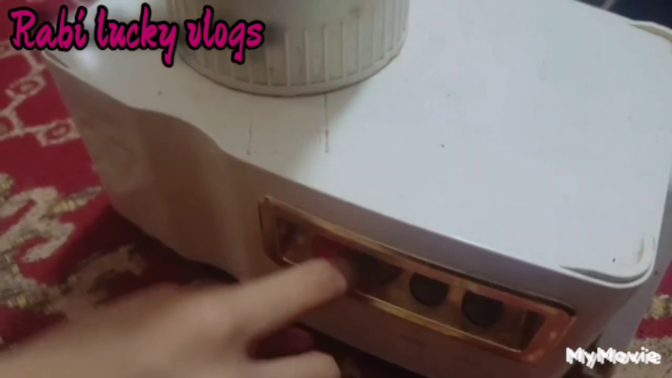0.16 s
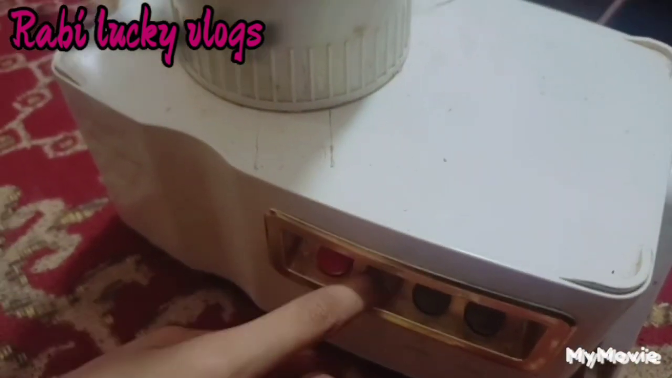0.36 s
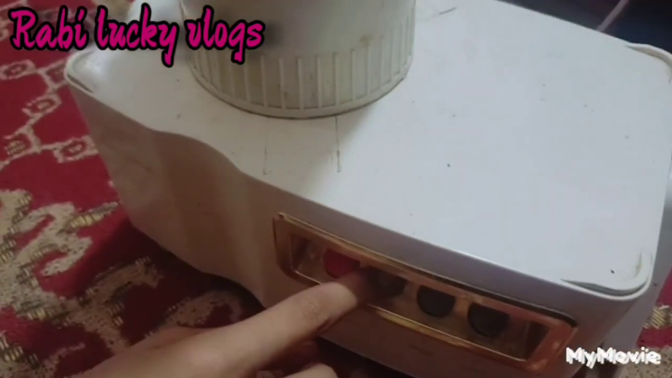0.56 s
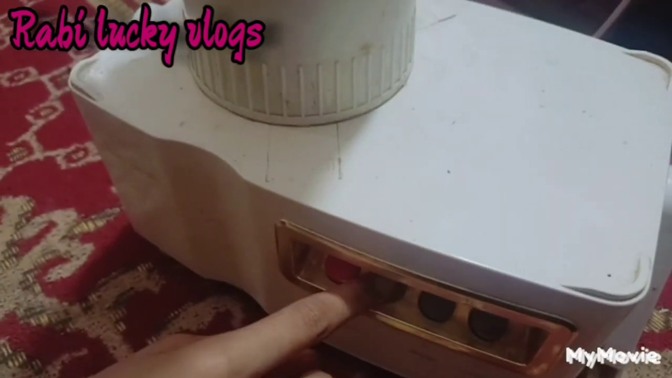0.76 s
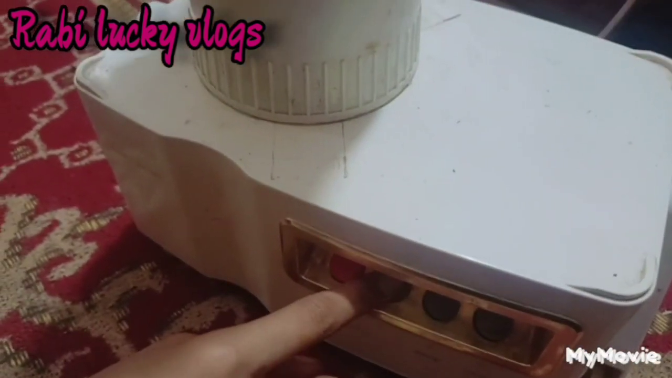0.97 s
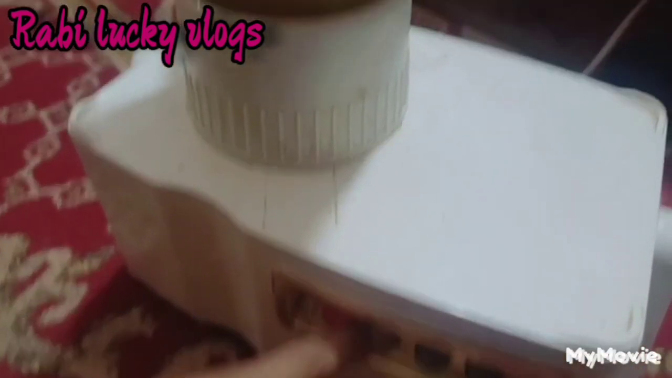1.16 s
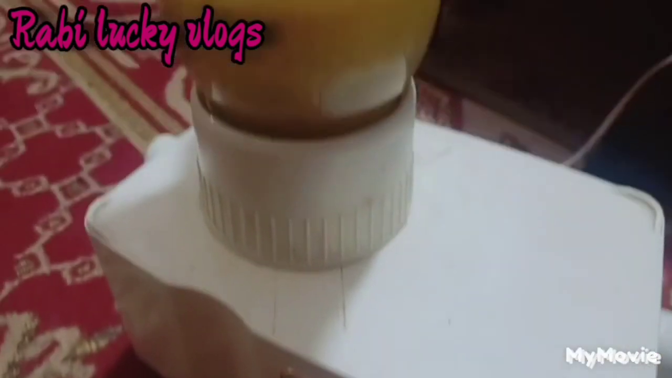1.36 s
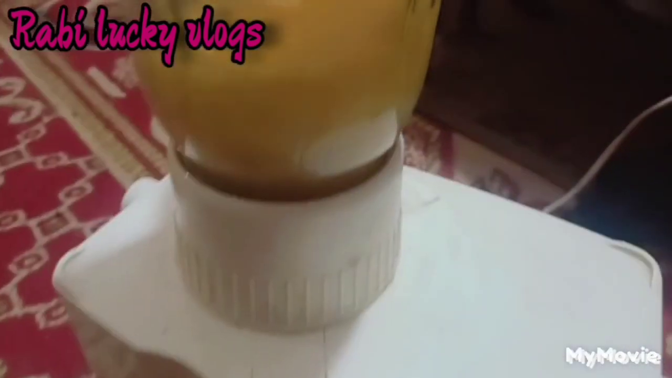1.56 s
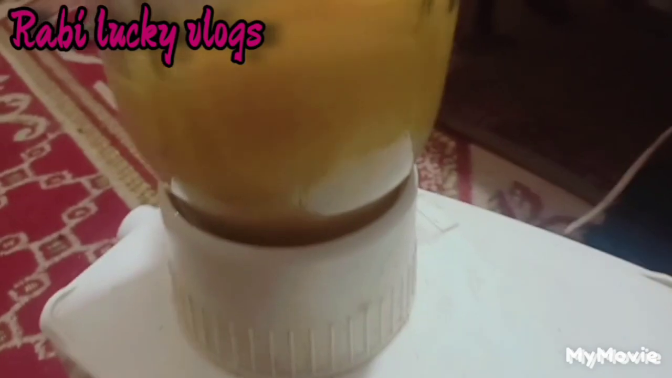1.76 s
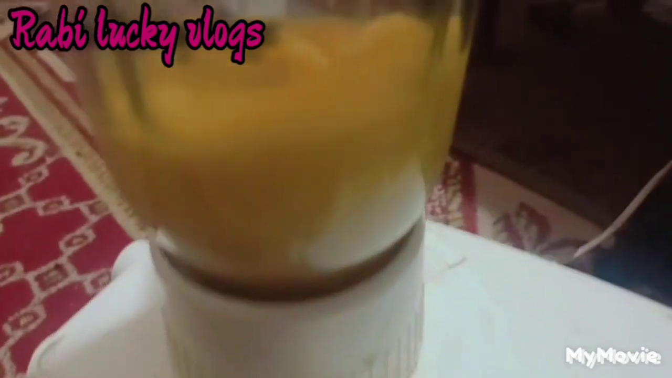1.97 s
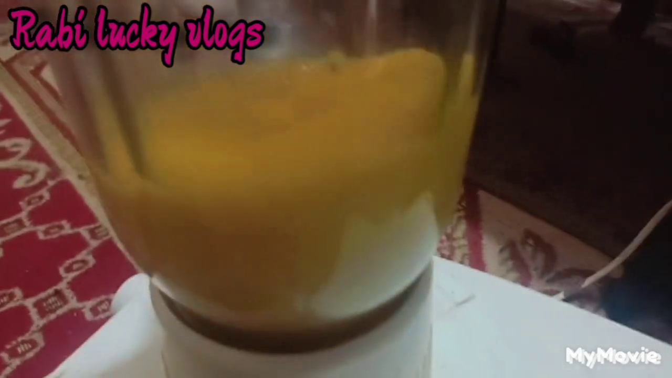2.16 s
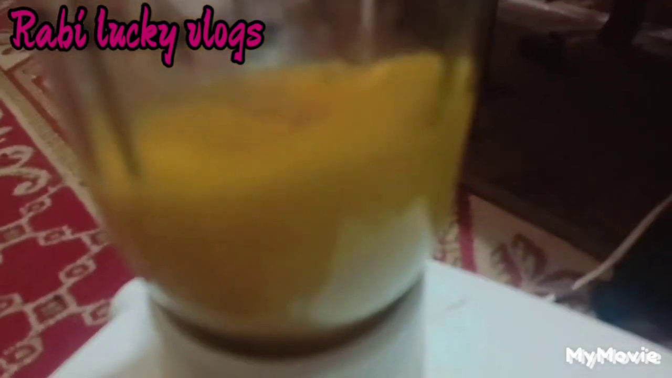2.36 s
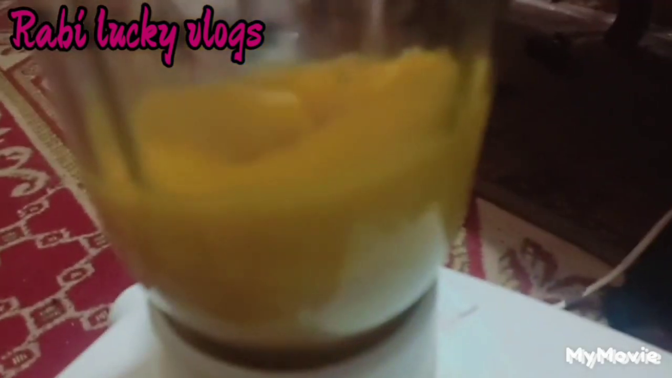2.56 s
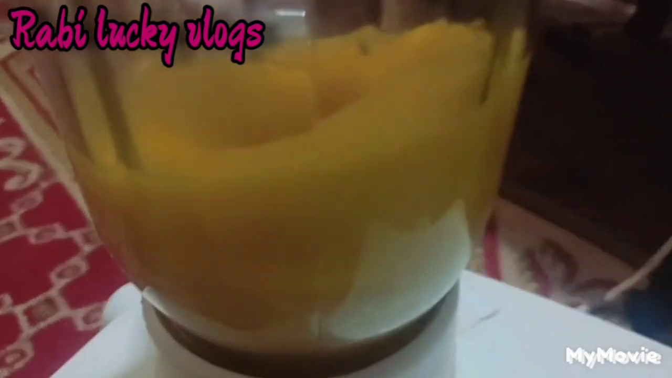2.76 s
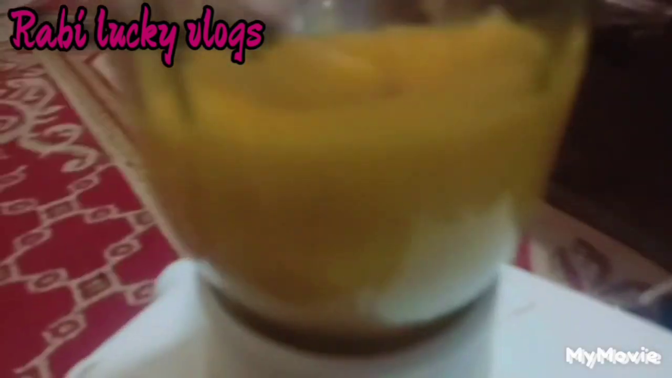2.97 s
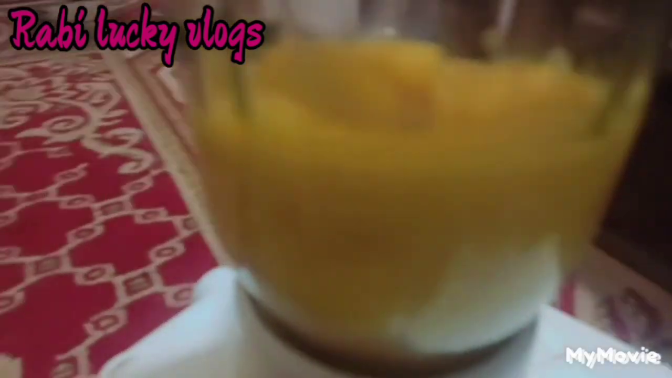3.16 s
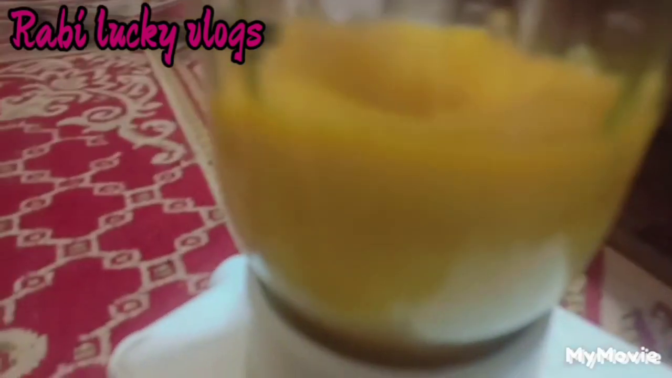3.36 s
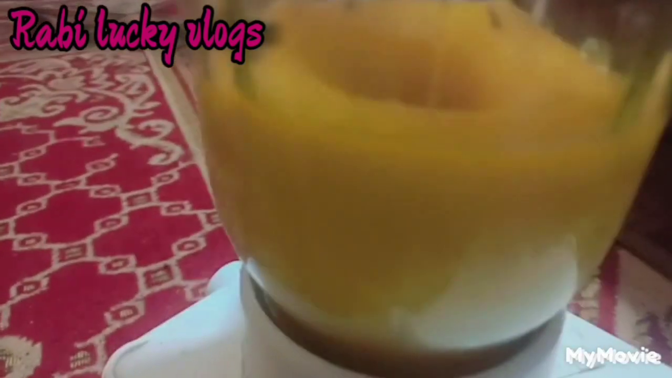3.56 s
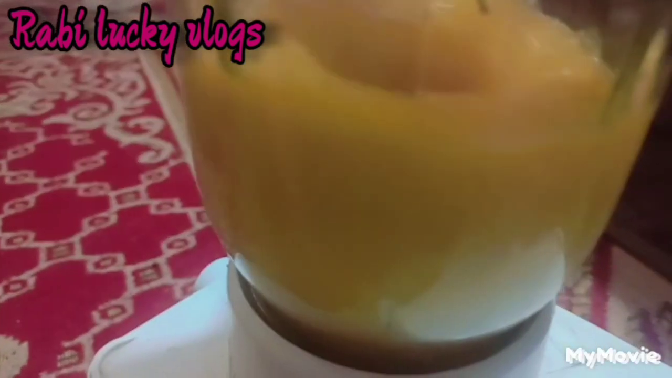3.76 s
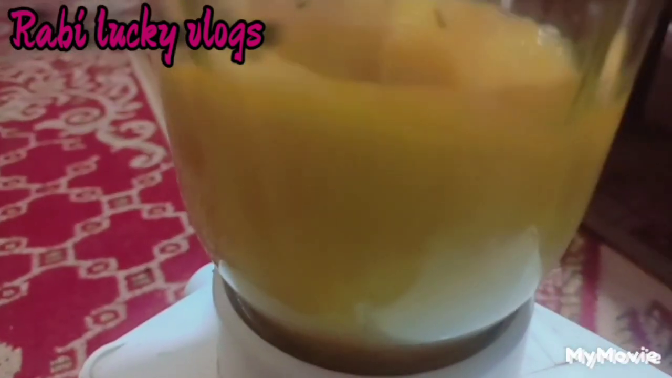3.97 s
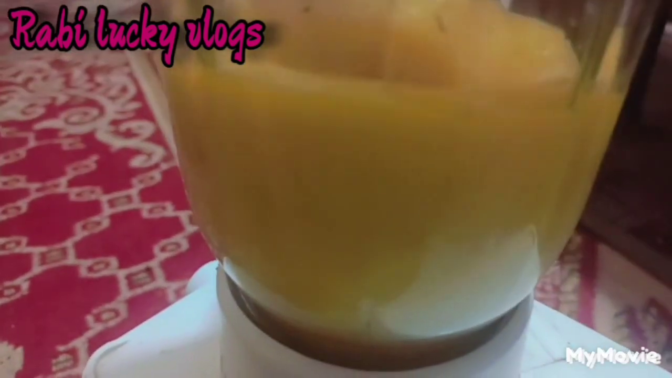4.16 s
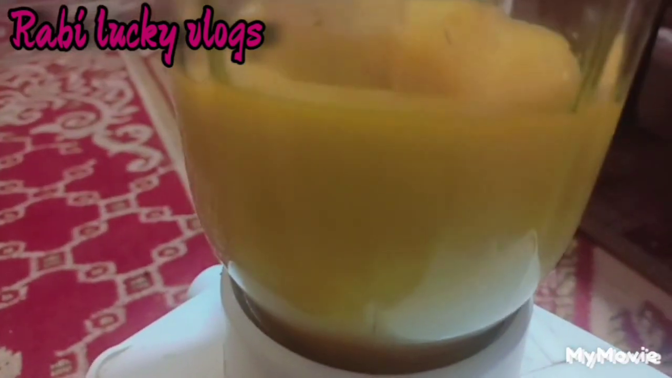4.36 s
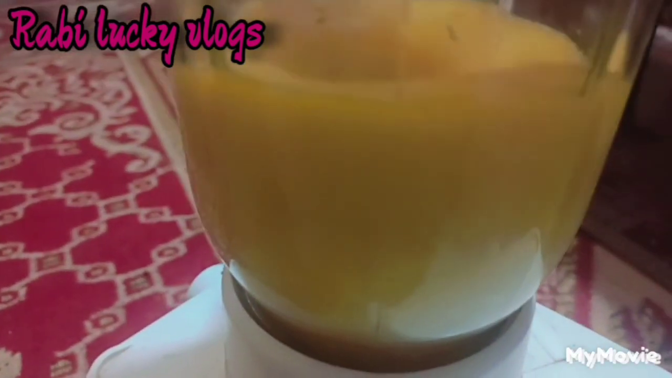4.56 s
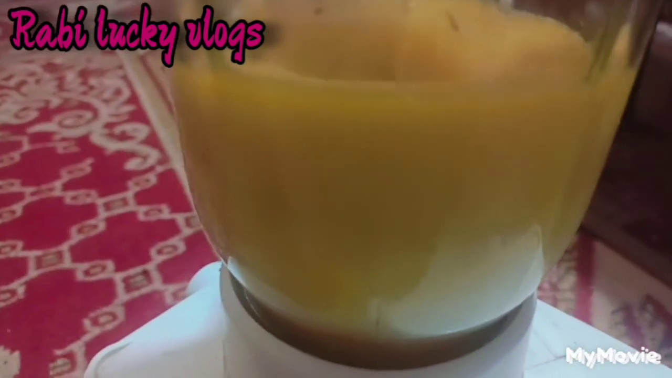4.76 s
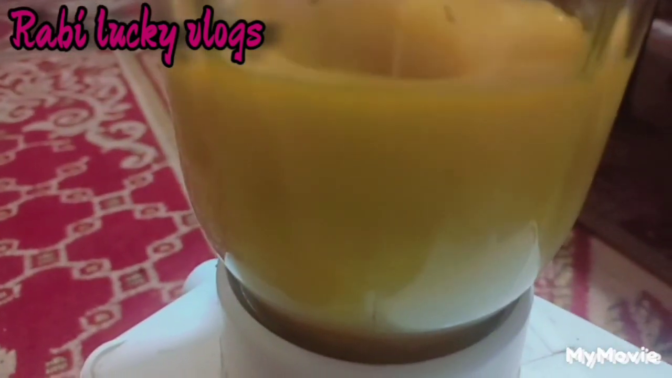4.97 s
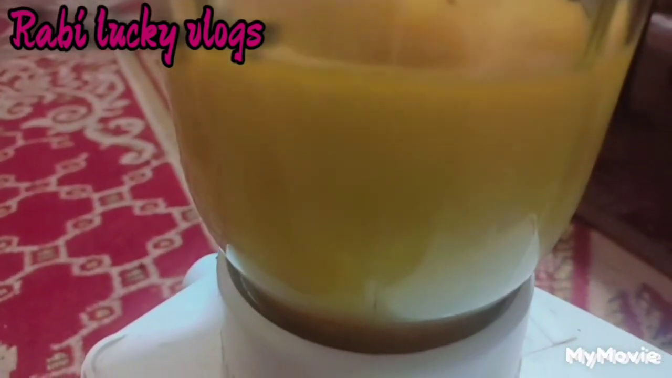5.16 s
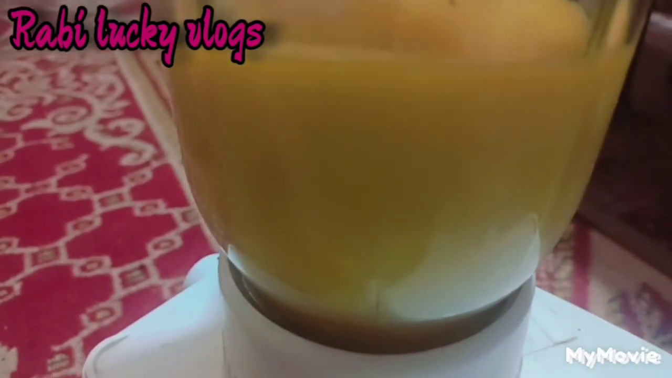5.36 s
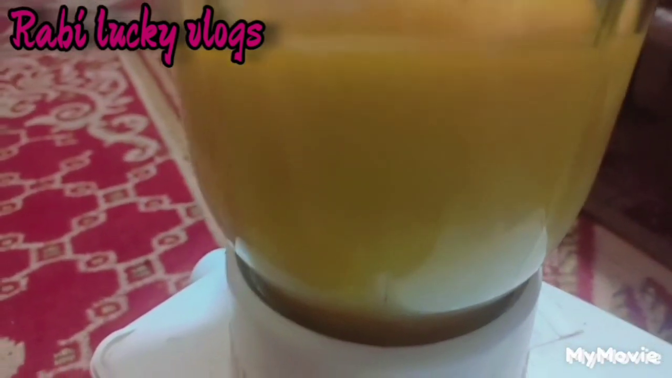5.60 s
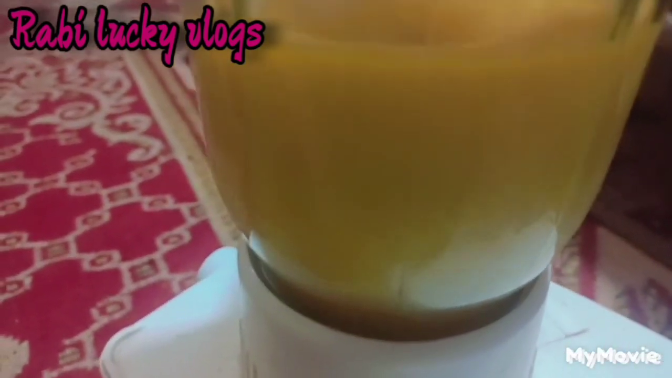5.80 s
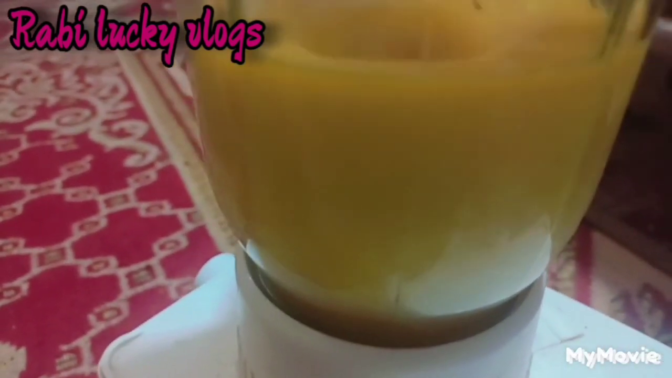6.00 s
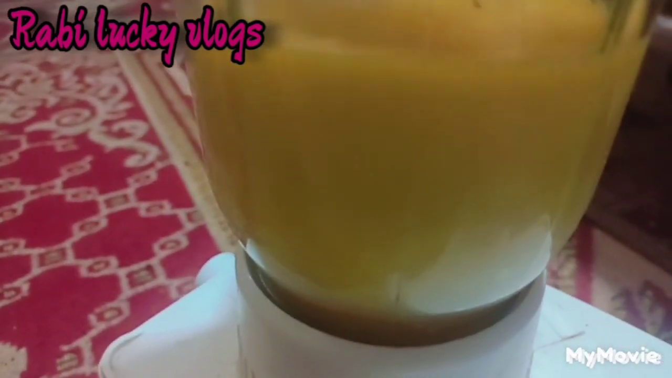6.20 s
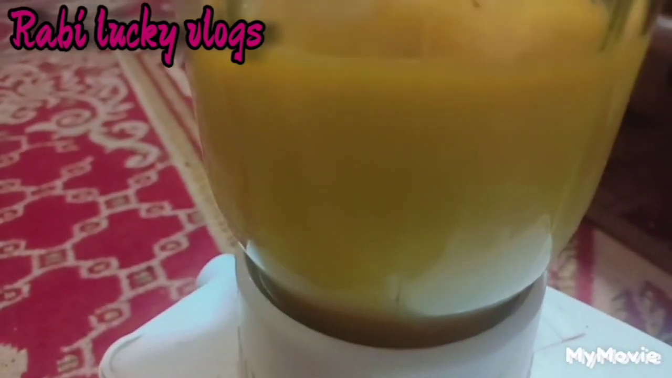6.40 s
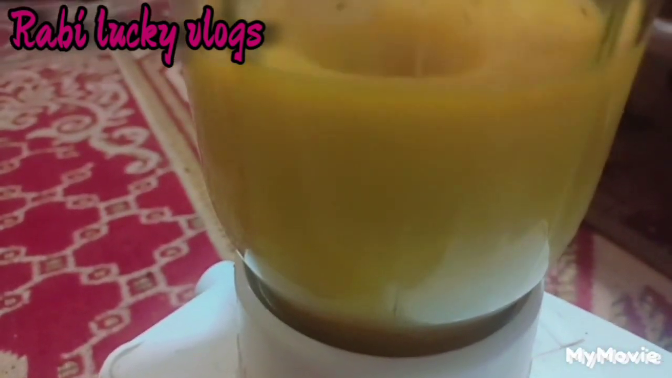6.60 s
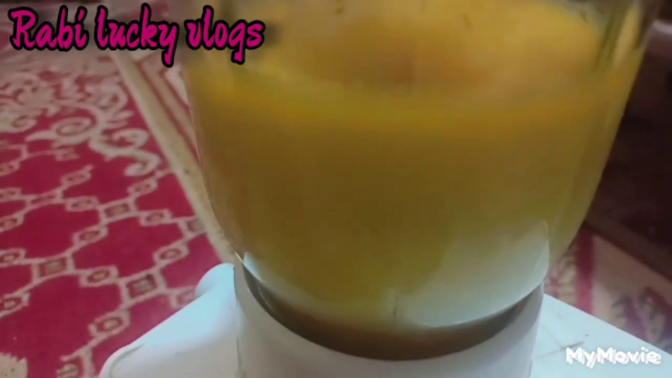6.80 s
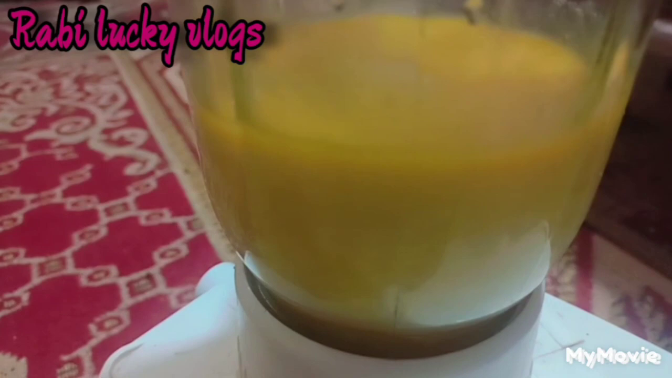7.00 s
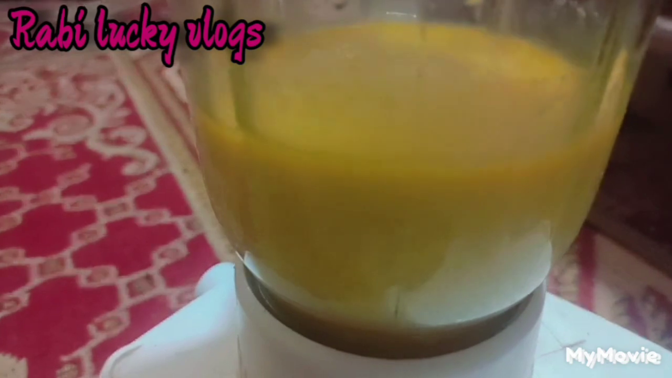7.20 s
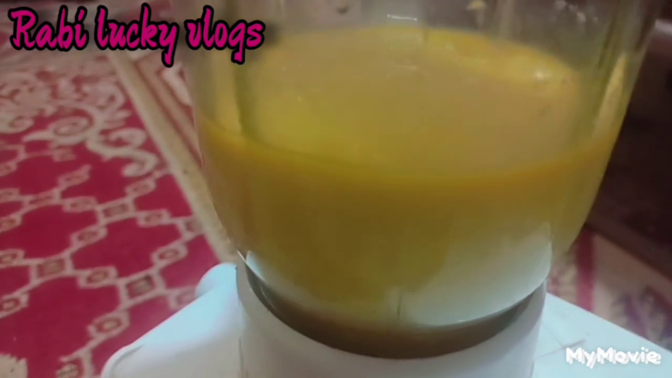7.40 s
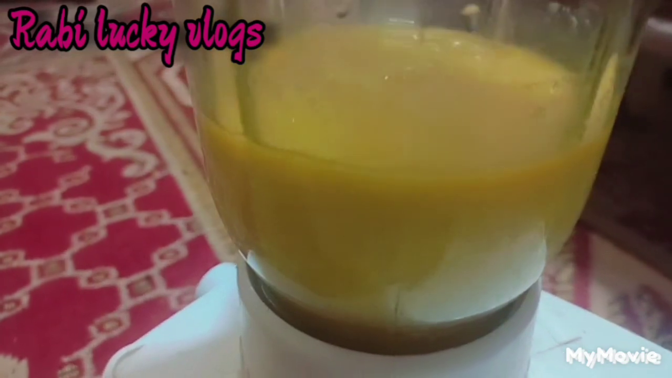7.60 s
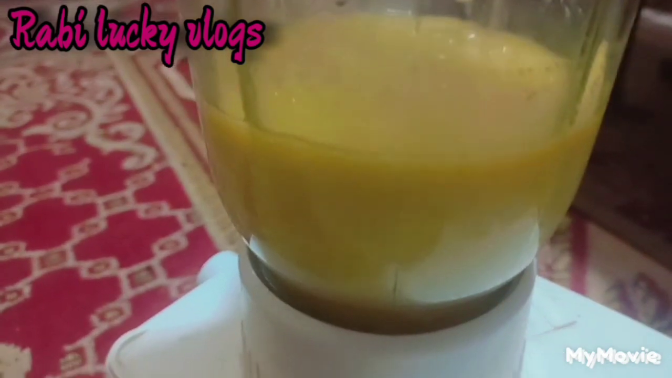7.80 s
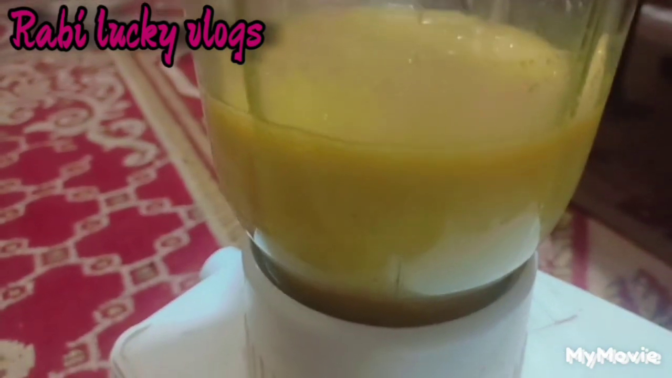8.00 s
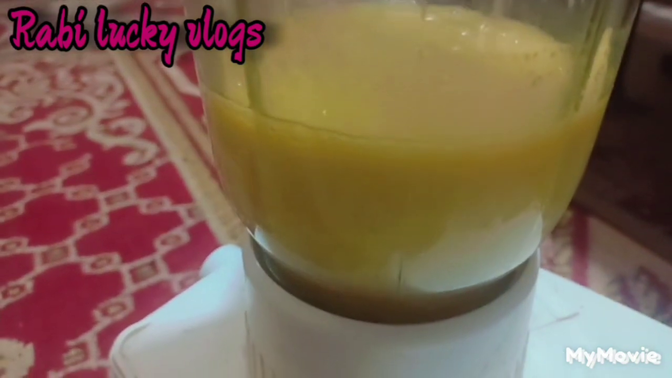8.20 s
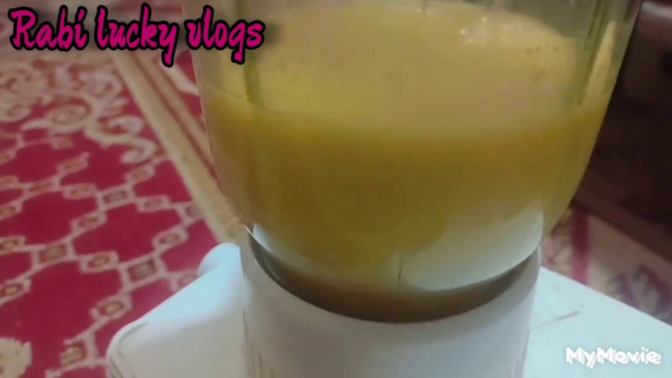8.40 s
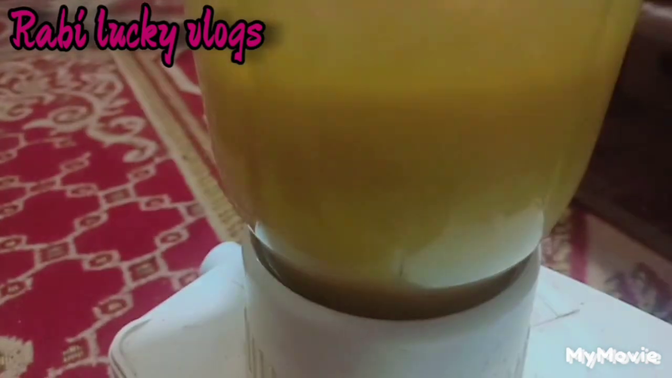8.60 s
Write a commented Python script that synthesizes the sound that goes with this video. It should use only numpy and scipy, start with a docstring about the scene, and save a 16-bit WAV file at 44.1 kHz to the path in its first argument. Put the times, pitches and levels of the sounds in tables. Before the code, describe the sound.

A kitchen blender starts with a few knocks, a low thrum and a hiss, then runs loudly on a thick drink, its plastic base and jar rattling with a fast throb. It is switched off with a clack. Buttons click, the drink bubbles faintly and soft room noise comes up before the motor starts again at the very end. The microphone is close, moving from the buttons to the jar.

```python
"""A kitchen blender on a thick drink, close up on one microphone. The motor pulls up with a thrum and a
hiss of brushes; coupling and blades rattle the plastic base and jar, throbbing once a turn, with the odd
hard knock. The microphone moves from the buttons up beside the jar. At 6.8 s the motor is switched off:
buttons clack, the drink bubbles, and the gain control lets the room noise come up. A second and a half
later the blender starts again."""
import sys
import numpy as np
from scipy import signal
from scipy.fft import rfft, irfft
from scipy.io import wavfile
from scipy.ndimage import uniform_filter1d, minimum_filter1d, map_coordinates

SR = 44100
rng = np.random.default_rng(int(sys.argv[2]) if len(sys.argv) > 2 else 0)


def persist_wave(psi):
    """Save psi, clipped to +-1, as 16-bit WAV."""
    counts = np.round(np.clip(psi, -1, 1) * 32767).astype(np.int16)
    wavfile.write(sys.argv[1], SR, np.atleast_2d(counts).T)


N = 381465
TIME = np.arange(N) / SR
HZ = np.fft.rfftfreq(4096, 1 / SR) + 1e-3
START_HZ, TOP_HZ = 45.3, 66.87  # shaft turns a second: at switch-on, at full speed

# resonances of base and jar from three microphone places:
# pitch_hz, width_hz, at_buttons_db, at_jar_foot_db, beside_jar_db
BODY = [(177, 92, -19, -17.5, -18), (251, 45, -20, -11.5, -16), (318, 58, -8, -8, -11.5),
        (379, 49, -9, -8.5, -9), (585, 200, -13, -14.5, -15.5), (820, 179, -2, -2.5, -3),
        (1327, 810, -6, -12.5, -10), (1457, 174, -17, -4, -5), (1876, 117, -1, -1, -1),
        (2044, 45, -19, -2, -5), (2426, 1140, -6.5, -7.5, -7), (2824, 500, -1, 1.8, 3.5),
        (3170, 500, 6.5, 0, -4.5), (3350, 220, -3, 6.5, 1.5), (3603, 287, -20, 7, 4),
        (3924, 410, -4, -3, 1.1), (4300, 570, -1, -11, -32), (4750, 530, -34, -46, -11),
        (5485, 410, -7, -13.5, -12), (5970, 560, -10.5, -8, -10.5), (7070, 1380, -10.5, -11, -13),
        (8820, 1060, -14, -27, -22), (12730, 5300, -69, -31, -34.5), (15464.0, 1500, -37, -37.6, -42)]


def blender():
    """The running machine: rattle, brush hiss, starting thrum and mains hum."""
    drive = impacts()
    return rattle(drive) + brush_hiss(drive) + thrum() + hum()


def impacts(per_turn=15, spread_db=3.0, lump_db=0.5, scatter_s=0.007, contacts=12):
    """Small blows of coupling and blades, swelling once a turn and with lumps in the drink."""
    speed = shaft_speed() * (1 + 0.017 * wander(8))
    angle = 2 * np.pi * np.cumsum(speed) / SR
    throb_db = np.clip(TOP_HZ / speed, 1, 1.5) ** 2.1  # a slow shaft throbs harder
    pressure = amp(throb_db * (np.cos(angle) + 0.23 * np.cos(2 * angle)) + lump_db * wander(45))
    size = amp(spread_db * np.minimum(rng.exponential(1, N), 3)) * rng.choice([-1, 1], N)
    clicks = size * (rng.random(N) < per_turn * speed / SR)
    contact = rng.integers(0, contacts, N)
    blows, t = np.zeros(N), np.arange(SR // 20) / SR
    for k in range(contacts):
        shell_echo = unit_rms(rng.standard_normal(len(t)) * np.exp(-t / scatter_s)) / np.sqrt(len(t))
        shell_echo[0] += 0.76  # the direct blow
        # each contact point favours other resonances
        reach = 1 + 0.98 * np.cos(2 * np.pi * (np.log2(HZ) / 1.7046 + k / contacts))
        blows += signal.oaconvolve(clicks * (contact == k), colour(shell_echo, np.sqrt(reach)))[:N]
    return unit_rms(pressure * (unit_rms(blows) + 0.47 * rng.standard_normal(N)))


def rattle(drive, swirl_s=0.62):
    """The blows ring base and jar; the jar's own resonances open up once the drink swirls."""
    hz, width, *places_db = np.transpose(BODY)
    in_jar = (hz > 700) & (hz < 1700) | (hz > 3300) & (hz < 4200) | (hz > 5300) & (hz < 6200)
    main_band = (HZ > 2200) & (HZ < 4400)
    swirl = 0.92 * (1 - np.exp(-(TIME / swirl_s) ** 4))
    ring = np.zeros(N)
    for place, db in enumerate(places_db):
        free, damped = peaks(hz, width, db), peaks(hz, width, db - 6 * in_jar)
        for share, gain in (swirl, free), (1 - swirl, damped):
            band_rms = np.sqrt(np.mean(gain ** 2 * main_band))
            ring += nearness(place) * share * colour(drive, gain) / band_rms
    ring *= rattle_force()
    dull = signal.oaconvolve(ring, signal.firwin(31, 10000, fs=SR), "same")
    dull_share = np.clip(1 - TIME / 1.06, 0, .6)  # the first, slower blows are less bright
    return (1 - dull_share) * ring + dull_share * dull


def rattle_force(grip_s=0.039, unpowered_db=-5.5):
    """The rattle sets in quickly, follows the load, and dies with the speed after switch-off."""
    # force of the rattle as the load on the blades shifts: time_s, gain_db
    load = [(0.0, -19), (0.24, -14), (0.7, -17), (1.15, -13), (1.24, -16.5), (1.83, -15), (3.17, -15.5),
            (3.25, -16), (3.46, -12.5), (4.89, -14), (5.65, -11.5), (5.78, -14.5), (6.65, -13.5),
            (6.78, -15)]
    age, coast, run_db, _, _ = motor()
    grip = 1 - np.exp(-age / grip_s)
    return amp(curve(load) + run_db + unpowered_db * (coast > 0)) * grip * slowing(coast) ** 1.45


def motor(switch_off_s=6.79):
    """At every sample: time since switch-on, time spent coasting, and the settings of the run."""
    # runs of the motor: switch_on_s, force_db, spin_up_s, thrum_s
    runs = [(-.1, 2, 1.3, 0.37), (8.386, 6.5, 0.0622, 0.11)]
    rows = np.array(runs)
    current = np.maximum(np.searchsorted(rows[:, 0], TIME) - 1, 0)
    on_s, force_db, spin_up_s, thrum_s = rows[current].T
    coast = np.maximum(TIME - switch_off_s, 0) * (on_s < switch_off_s)
    return np.maximum(TIME - on_s, 0), coast, force_db, spin_up_s, thrum_s


def shaft_speed():
    """Turns a second: the shaft pulls up to full speed, then coasts when the power goes."""
    age, coast, _, spin_up_s, _ = motor()
    return (TOP_HZ - (TOP_HZ - START_HZ) * np.exp(-(age / spin_up_s) ** 2)) * slowing(coast)


def slowing(coast_s, half_speed_s=0.12):
    """Share of its speed that the shaft keeps while the drink brakes it."""
    return 1 / (1 + (coast_s / half_speed_s) ** 3)


def brush_hiss(drive):
    """The brushes hiss under the load of the first start, flickering with the blows."""
    # course of the hiss: time_s, level_db
    course = [(0, -64), (.1, -30), (.25, -22.5), (.58, -21.5), (.72, -35), (1.1, -27.5), (1.4, -39),
              (2, -78)]
    # spectrum of the hiss: frequency_hz, density_db
    spectrum = [(3000, -21), (5500, -4.5), (7300, 0.5), (8200, -3), (9000, -2), (9600, -16), (10800, -18),
                (12000, -29), (15500, -31)]
    sparks = np.sqrt(abs(drive)) * rng.standard_normal(N)
    return unit_rms(colour(sparks, slope(spectrum))) * amp(curve(course))


def thrum():
    """The base thrums on the floor each time the motor pulls up."""
    # spectrum of the thrum: frequency_hz, density_db
    spectrum = [(50, -37), (100, -26), (135, -13), (200, 0), (320, 5.5), (460, -6), (590, 7.5), (800, -3),
                (1200, -10), (3000, -66)]
    age, *_, thrum_s = motor()
    rumble = unit_rms(colour(rng.standard_normal(N), slope(spectrum)))
    return amp(-25.5) * rumble * np.exp(-(age / thrum_s) ** 4)


def hum():
    """The motor's iron buzzes near multiples of the mains while it has power."""
    # tones of the iron: pitch_hz, at_buttons_db, at_jar_foot_db, beside_jar_db
    tones = [(150, -37, -54.5, -48.5), (200.3, -33.5, -56, -50), (248.6, -60, -42.5, -63),
             (294.5, -47, -62, -57)]
    out = np.zeros(N)
    for hz, *places_db in tones:
        heard = sum(nearness(place) * amp(db) for place, db in enumerate(places_db))
        out += heard * amp(1.5 * wander(4)) * np.sin(2 * np.pi * hz * TIME + .25 * wander(5))
    _, coast, *_ = motor()
    return out * (coast == 0)


def knocks():
    """The coupling jumps and strikes the base."""
    # hard knocks: start_s, level_db, treble_db, bass_db
    strikes = [(0.0686, -2, -27, -16), (0.1077, -6.5, 7, -25.5), (0.1289, -5, -33, -28),
               (2.3876, 12.5, -26, -43), (6.677, -18, -36, -39), (8.3861, -5, -28, -19)]
    out = np.zeros(N)
    base = peaks(*np.transpose(BODY)[:3])
    for start_s, level_db, treble_db, bass_db in strikes:
        knock = plastic_blow(base, treble_db, bass_db, chatter_s=.006, tail_db=-18, tail_s=.012)
        add(out, start_s, amp(level_db - 1.5) * knock)
    return out


def buttons():
    """Push buttons clack in the switch block and set their spring ringing."""
    # button clacks: start_s, level_db, treble_db, bass_db, spring_db
    clacks = [(6.7877, 1, -29, -27, -50), (6.976, -30.5, -13, -16, -62), (7.01, -7, -33, -20, -55),
              (7.0423, -18, -28, -16, -60), (7.2492, -14.5, -30.5, -16, -54), (7.364, -22.5, -30, -7, -65),
              (7.973, -20.5, -33, -22, -38), (8.139, -20, -23, -22, -33), (8.2804, -21, -22.5, -20, -34),
              (8.401, -0.5, -26.5, -33, -45)]
    # resonances of the switch block: pitch_hz, width_hz, level_db
    block_modes = [(345, 730, -13.5), (1320, 970, -23), (2170, 1100, -9), (2616, 81, 1.5), (3100, 200, -2),
                   (3470, 410, -3), (4130, 520, -16), (5440, 2400, -20.5), (7000, 1000, -11),
                   (8850, 2600, -18), (13000, 4600, -31)]
    # modes of the spring: pitch_hz, level_db, t60_s
    spring_modes = [(7300, -1, 0.24), (7300, -6, 0.25), (8877, -4, 0.15)]
    out, t = np.zeros(N), np.arange(SR // 4) / SR
    block = peaks(*np.transpose(block_modes))
    spring = sum(np.sin(2 * np.pi * hz * t) * amp(db - 60 * t / t60) for hz, db, t60 in spring_modes)
    for start_s, level_db, treble_db, bass_db, spring_db in clacks:
        clack = plastic_blow(block, treble_db, bass_db, chatter_s=.007, tail_db=-14, tail_s=.02)
        firm_db = 8 * np.clip(2 + level_db / 14, 0, 1)  # full presses hit the stop harder
        add(out, start_s, amp(level_db + firm_db) * clack + amp(spring_db) * spring)
    return out


def plastic_blow(body, treble_db, bass_db, chatter_s, tail_db, tail_s):
    """One plastic knock of peak 1: a brief chatter of contacts, then a faint room tail."""
    t = np.arange(SR // 4) / SR
    envelope = np.exp(-(t / chatter_s) ** 2) + amp(tail_db) * np.exp(-t / tail_s)
    tilt = slope([(700, bass_db + 22), (1800, 0), (4200, 0), (7000, treble_db + 25)])
    roll_off = 1 / np.sqrt(1 + (HZ / 9000) ** 8)
    sound = colour(rng.standard_normal(len(t)) * envelope, body * tilt * roll_off)
    return sound / abs(sound).max()


def gurgle(loudest_db=-34.5, rise=0.054, cycles_to_peak=10, count=24):
    """Air rises out of the settling drink in small bubbles, each a short rising note."""
    out, t = np.zeros(N), np.arange(SR // 8) / SR
    for when, octave, faintness in rng.random((count, 3)):
        hz = 540 * 2 ** octave
        age = t * hz / cycles_to_peak
        note = np.sin(2 * np.pi * hz * t * (1 + rise * np.tanh(age))) * age * np.exp(1 - age)
        add(out, 7.33 + .5 * when, amp(loudest_db - 10 * faintness) * note)
    return out


def reflections(x, far_db=-22.5, near_db=-23.5):
    """Two close surfaces reflect the blender; their lags shift as the microphone moves."""
    # delays off the two surfaces: time_s, far_lag_ms, near_lag_ms
    lags = [(1.05, 0.5, 0.31), (1.6, 0.42, .365), (2.3, 0.54, 0.37), (3.2, 0.51, .31), (4.3, 0.567, 0.32),
            (5.4, .54, 0.29), (6.3, 0.5, 0.29)]
    time_s, *lags_ms = np.transpose(lags)
    out = np.zeros(N)
    for lag_ms, db in zip(lags_ms, (far_db, near_db)):
        earlier = np.arange(N) - np.interp(TIME, time_s, lag_ms) * SR / 1000
        out += amp(db) * map_coordinates(x, [earlier], order=3)
    return out


def room():
    """Kitchen room tone: a gently wavering rush with a few broad tones."""
    # spectrum of the rush: frequency_hz, density_db
    spectrum = [(25, -28), (45, -11), (70, -3), (130, 1), (200, -0.5), (330, -8.5), (700, -6), (1200, -7.5),
                (1950, -12.5), (3900, -8.5), (4700, -24.5), (7300, -16.5), (9200, -22), (10200, -36),
                (14000, -44)]
    # broad tones of the room: pitch_hz, width_hz, level_db
    bands = [(210, 85, 0.5), (533, 37, 3.5), (623, 77, -1), (880, 76, -1), (2630, 130, -4.5),
             (2990, 100, -0.5), (3330, 180, -14), (3830, 380, -5.5)]
    rush = colour(rng.standard_normal(N), slope(spectrum)) * amp(.5 * wander(15))
    tones = colour(rng.standard_normal(N), peaks(*np.transpose(bands))) * amp(2.7 * wander(2))
    return amp(-31.5) * unit_rms(rush + tones)


def nearness(place):
    """How close the microphone is to one of its three places, 0 to 1."""
    # microphone path: time_s, place (0 at the buttons, 1 at the foot of the jar, 2 beside the jar)
    path = [(.45, .45), (.9, 0.58), (1.2, 0.69), (1.55, 0.95), (2.85, 1.27), (3.3, 2.26)]
    return np.maximum(1 - abs(curve(path) - place), 0)


def amp(db):
    """Decibels to gain."""
    return 10 ** (np.asarray(db) / 20)


def unit_rms(x):
    """Scales to rms 1."""
    return x / np.sqrt(np.mean(x ** 2) + 1e-20)


def curve(rows):
    """A control curve at every sample, from (time_s, value) points."""
    return np.interp(TIME, *np.transpose(rows))


def slope(points):
    """Gain over frequency from (frequency_hz, level_db) points."""
    hz, db = np.transpose(points)
    return amp(np.interp(np.log(HZ), np.log(hz), db))


def peaks(hz, width, db):
    """Gain over frequency of steep resonances whose powers add."""
    detune = (HZ[:, None] ** 2 - hz ** 2) / (HZ[:, None] * width)
    return np.sqrt(((amp(db) / (1 + detune ** 2)) ** 2).sum(1))


def colour(x, gain):
    """Minimum-phase filter with the given gain: it rings after a click, never before."""
    log_gain = np.log(np.maximum(gain, 1e-5))
    mirrored = np.r_[log_gain, log_gain[-2:0:-1]]
    taps = np.fft.ifft(np.exp(np.conj(signal.hilbert(mirrored)))).real
    return signal.oaconvolve(x, taps[:len(HZ)])[:len(x)]


def wander(rate_hz):
    """Random drift of rms 1, mostly slower than the rate."""
    hz = np.fft.rfftfreq(N, 1 / SR)
    return unit_rms(irfft(rfft(rng.standard_normal(N)) / (1 + (hz / rate_hz) ** 2), N))


def add(mix, start_s, sound):
    """Lays a sound into the mix."""
    part = mix[max(round(start_s * SR), 0):][:len(sound)]
    part += sound[:len(part)]


def scene():
    """The blender close by, its buttons, the settling drink and the room behind, in mono."""
    machine = amp(7) * (blender() + knocks())
    return (machine + reflections(machine) + buttons() + gurgle() + room())[None]


def record(dry, duck_db=8, recovery_db_per_s=140, ceiling=.93, edge_hz=15650):
    """The recorder: gain control with a short range, a quick limiter on peaks, then the band limit."""
    power_db = 10 * np.log10(abs(uniform_filter1d(dry[0] ** 2, size=400)) + 1e-12)
    over_db = np.clip(power_db + 22.5, 0, duck_db)
    over_db += 0.39 * np.maximum(power_db + 5, 0)  # the loudest bursts are eased further
    recovery_db = TIME * recovery_db_per_s
    cut_db = np.maximum.accumulate(over_db + recovery_db) - recovery_db
    ducked = dry[0] / amp(uniform_filter1d(cut_db, size=100))
    headroom = ceiling / np.maximum(abs(ducked), ceiling)
    limited = ducked * uniform_filter1d(minimum_filter1d(headroom, size=81), size=81)
    lowpass = signal.firwin(511, edge_hz, window=("kaiser", 9), fs=SR)
    return signal.oaconvolve(limited, lowpass, "same")[None]


dry = scene()
out = record(dry)
persist_wave(out)
```